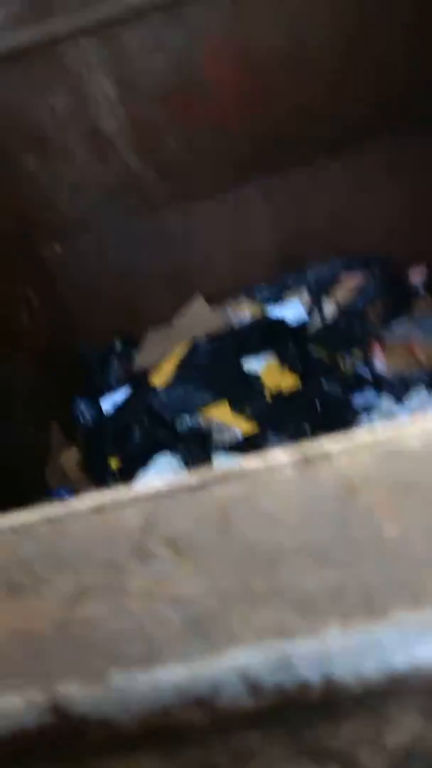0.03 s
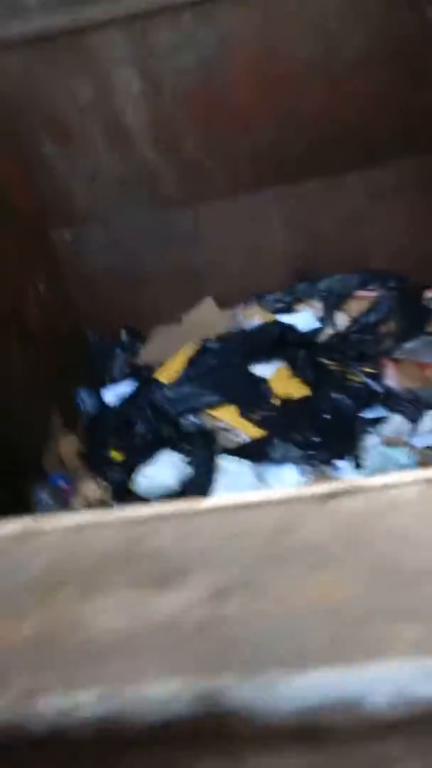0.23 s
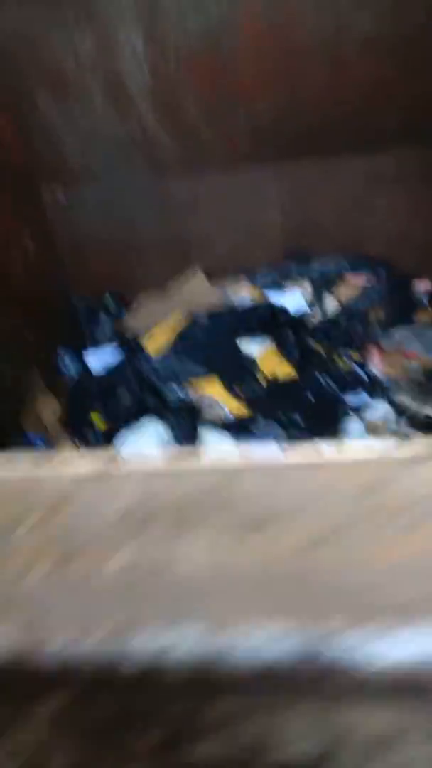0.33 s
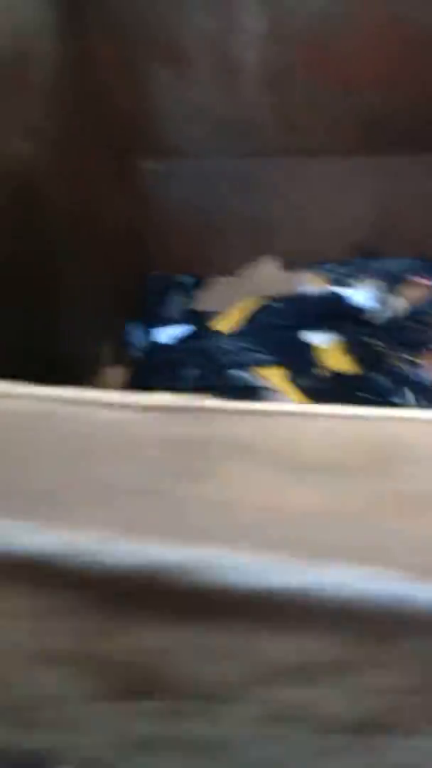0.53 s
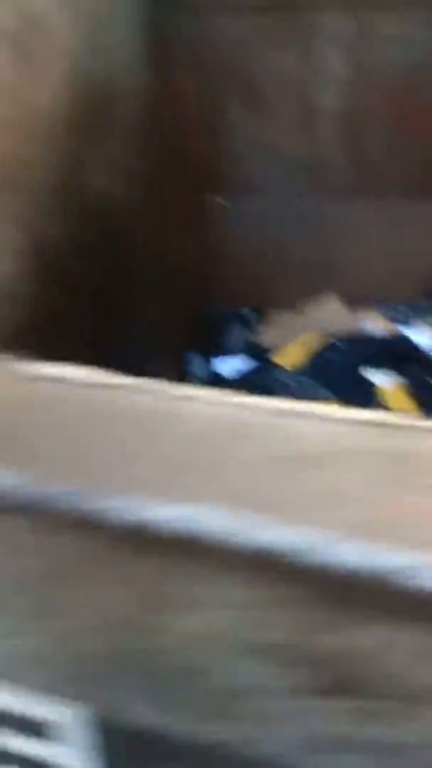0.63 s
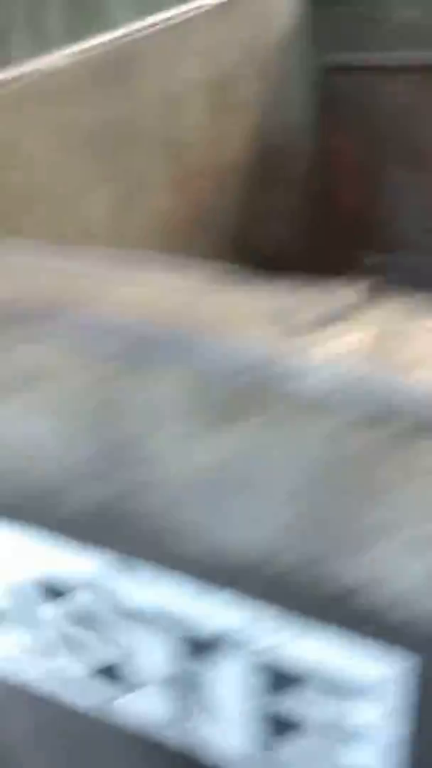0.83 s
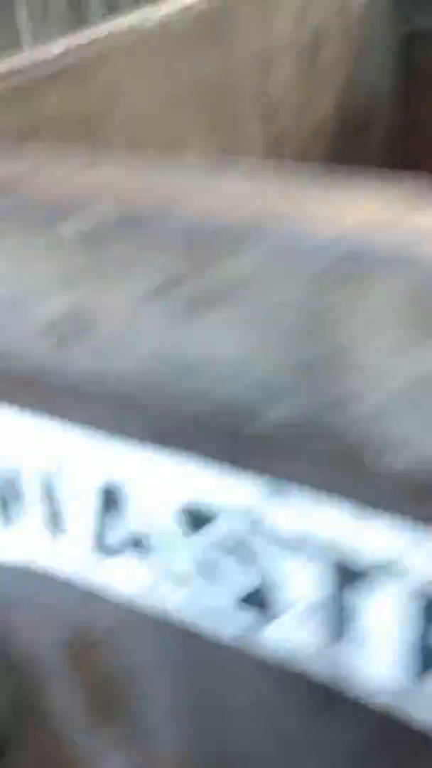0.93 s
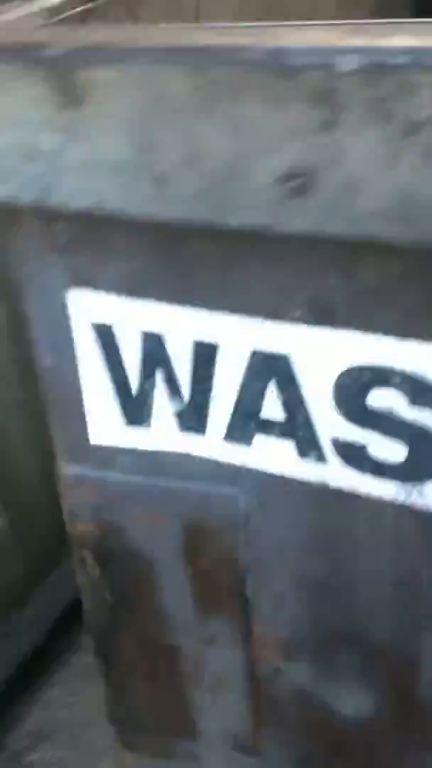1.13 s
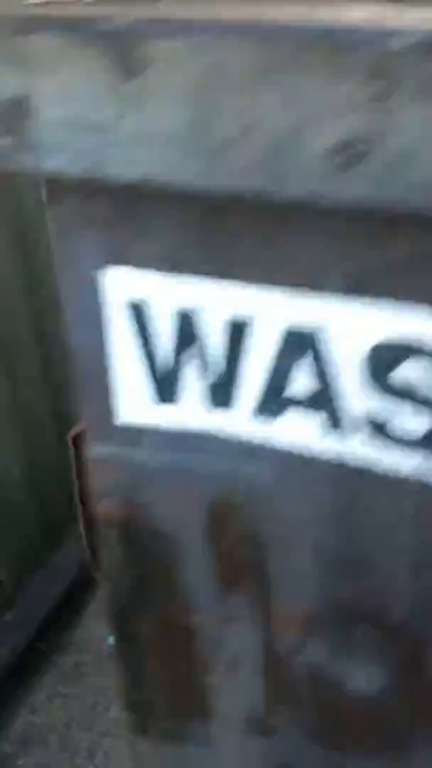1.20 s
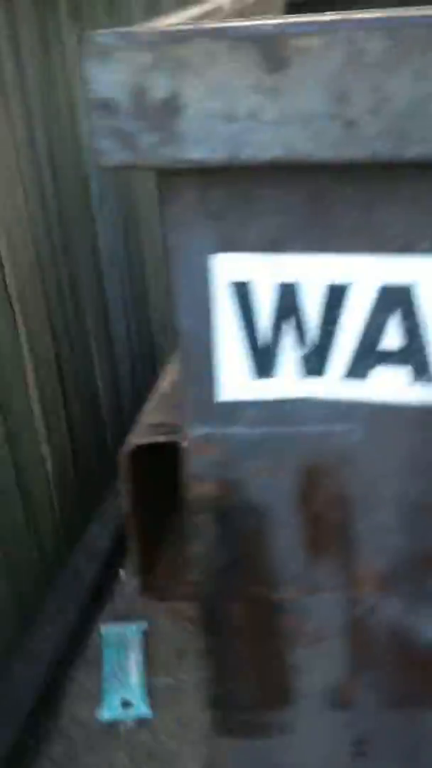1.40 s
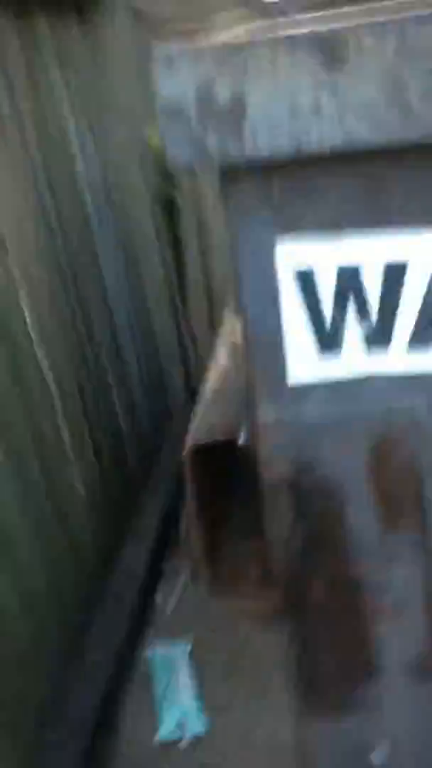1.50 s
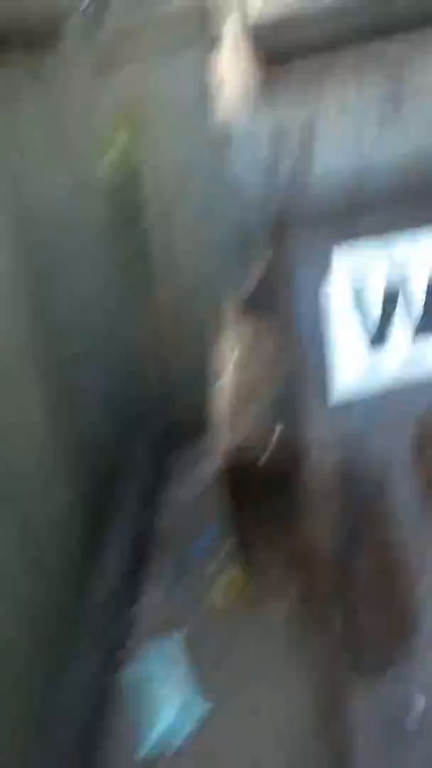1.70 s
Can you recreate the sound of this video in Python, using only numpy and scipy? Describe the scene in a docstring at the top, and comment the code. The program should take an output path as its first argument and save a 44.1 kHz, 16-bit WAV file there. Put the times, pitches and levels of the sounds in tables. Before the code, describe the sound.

Heavy thud and knock in a booming metal dumpster, with faint trash bag rustling.

```python
"""A swish, then a heavy load lands in a steel dumpster: a thud, a knock, and the load slumps.
Outdoors, on one microphone. Each blow shakes the steel sheets, and the walls and the air between
them boom for a second, squeezed by the recorder's limiter. Trash bags rustle inside as they settle,
and a shoe scuffs the ground, faintly midway and plainly at the end, over a low outdoor rumble."""
import sys
import numpy as np
from scipy import signal
from scipy.fft import rfft, irfft, next_fast_len
from scipy.io import wavfile
from scipy.ndimage import uniform_filter1d, minimum_filter1d, map_coordinates

SR = 44100
rng = np.random.default_rng(int(sys.argv[2]) if len(sys.argv) > 2 else 0)


def waveform_to_disk(signal):
    """Save audio, clipped to [-1, 1], as 16-bit WAV at the path in sys.argv[1]."""
    frames = np.transpose(np.atleast_2d(signal))
    scaled = np.clip(frames, -1, 1) * 32767
    samples = np.round(scaled).astype(np.int16)
    wavfile.write(sys.argv[1], SR, samples)


N = 77175

# The load striking the steel. Each row: start in seconds, boom in dB, shudder in dB, shudder cut-off
# in Hz, knock in dB, knock pitch in Hz, crack in dB, tick in dB.
BLOWS = [(0.215, -17.5, -7, 5000, -3.5, 435.4, -3, -48), (.2755, -14.5, -11, 3500, -5, 663, -9.5, -42.5),
         (.362, -15.5, -15, 380, -21, 710, -44.5, -91)]


def dumpster():
    """Every blow feeds the boom, shakes the sheets, knocks and cracks."""
    out = boom()
    for start, _, shudder_db, cutoff_hz, knock_db, knock_hz, crack_db, tick_db in BLOWS:
        out += amp(shudder_db) * shudder(start, cutoff_hz)
        out += amp(knock_db) * knock(start, knock_hz)
        out += crack(start, crack_db, tick_db)
    return out


# The bin's modes; close pairs beat, so the boom throbs at the microphone.
# Each row: pitch in Hz, level in dB, time to fall 60 dB (t60) in seconds.
BIN_MODES = [(48.3, -11.5, 1.48), (59.2, -6, 1.68), (82.2, -24.5, 1.6), (122.9, 4, 0.57),
             (142.4, -4.5, 1.6), (172.2, -6.5, 1.79), (178.4, -1.5, 1.47), (213.7, 5.5, 0.53),
             (247, -1, 0.98), (308.8, -8.5, 1.2), (357, -7.5, 0.69), (395.8, -11, 1.02), (467, -8.5, 0.65),
             (608, -22.5, 1), (728, -18, 0.4), (1110, -26.5, 0.11)]


def boom(rise_cycles=5.3, waver=.14, wavers_per_s=9):
    """Each blow adds energy to the modes, which build over a few swings and waver as the panels flex."""
    out = np.zeros(N)
    since_landing = since(BLOWS[0][0])
    for k, (hz, db, t60) in enumerate(BIN_MODES):
        energy = sum((amp(boom_db) * burst(start, rise_cycles / hz, t60)) ** 2
                     for start, boom_db, *_ in BLOWS)
        phase = 2 * np.pi * hz * since_landing + waver * wobble(wavers_per_s)
        flex = 1 + waver * wobble(wavers_per_s)
        out += (-1) ** k * amp(db) * np.sqrt(energy) * flex * np.sin(phase)
    return out


# The colour of the shaking sheets. Each row: frequency in Hz, relative level in dB.
SHUDDER_SPECTRUM = [(20, -8.5), (50, -8.5), (85, -3.5), (130, 2), (250, 1), (440, 2.5), (550, -12.5),
                    (750, -12), (1300, -25.5), (2600, -37.5), (4000, -51.5), (8000, -62.5), (15000, -82)]
# How long they ring. Each row: frequency in Hz, t60 in seconds.
SHUDDER_DECAY = [(50, 2.05), (170, 1.444), (400, 0.8), (750, 0.66), (1400, 0.39), (3000, 0.45),
                 (9000, 0.74)]


def shudder(start, cutoff_hz):
    """Countless close modes of the sheets; the high ones die sooner, and a soft blow hardly wakes them."""
    hz, t, bands = signal.stft(noise(SHUDDER_SPECTRUM), SR, nperseg=1024)
    decay = amp(-60 * np.maximum(t - start, 0) / along(SHUDDER_DECAY, hz)[:, None])
    lowpass = 1 / np.hypot(1, hz / cutoff_hz)[:, None]
    _, ringing = signal.istft(bands * decay * lowpass, SR, nperseg=1024)
    return ringing[:N] * ramp(start, rise_s=.0016)


# The steel right where the load hits. Each row: ratio to the knock pitch, level in dB.
KNOCK_NOTES = [(.91, -3), (1, -2), (1.1, -8), (1.65, -11)]


def knock(start, hz):
    """The struck spot gives a heavily damped clang of close notes."""
    return notes(KNOCK_NOTES, start, hz) * burst(start, rise_s=.0051, t60_s=.088)


# The body of the contact, then its hard edge. Each row: frequency in Hz, relative level in dB.
CRACK_SPECTRUM = [(200, -3.5), (550, 5), (780, 10.5), (1100, 1.5), (1700, -7.5), (3000, -23), (4500, -58),
                  (8000, -81.5)]
TICK_SPECTRUM = [(1000, -10), (3000, -2.5), (5300, -1.5), (7000, -25), (15000, -42)]


def crack(start, crack_db, tick_db, rise_s=.0029):
    """Load meets steel in a burst of noise with a brief bright tick on top."""
    body = amp(crack_db) * noise(CRACK_SPECTRUM) * burst(start, rise_s, t60_s=.049)
    tick = amp(tick_db) * noise(TICK_SPECTRUM) * burst(start, rise_s, t60_s=.029)
    return body + tick


# The swing on its way to the bin. Each row: time in seconds, level in dB.
SWING_LEVELS = [(0, -55), (.07, -46.5), (0.157, -35.5), (0.202, -36), (.24, -54)]
# The colour of its swish. Each row: frequency in Hz, relative level in dB.
SWISH_SPECTRUM = [(40, -14.5), (130, 5.5), (400, 1.5), (750, -4), (1100, -15), (2500, -23.5), (9000, -37),
                  (15000, -47)]


def swing():
    """The load moves through the air with a swish that swells until it lands."""
    times, db = np.transpose(SWING_LEVELS)
    return noise(SWISH_SPECTRUM) * amp(np.interp(since(0), times, db, right=-120))


# A shoe down at ground level. Each row: start in seconds, scrape in dB, hollow note in Hz,
# ring in dB, grit in dB, rise in seconds, t60 in seconds.
SCUFFS = [(0.7, -39, 635, -53, -72.5, 0.032, 0.078), (1.492, -39.5, 503.5, -38, -94, 0.014, 0.18),
          (1.551, -41, 845, -38.5, -91, 0.0031, 0.14), (1.59, -28.5, 778, -29.5, -48, 0.024, 0.077),
          (1.613, -24, 846, -20, -47.5, 0.0042, 0.082), (1.626, -27.5, 481, -32, -49.5, .018, 0.029),
          (1.652, -32, 517, -28.5, -41, 0.0015, 0.077)]
# The sole, then the grit beneath it. Each row: frequency in Hz, relative level in dB.
SOLE_SPECTRUM = [(60, -26.5), (170, -3), (380, -7), (520, 4), (860, -6.5), (1100, -10.5), (2500, -34),
                 (6000, -55)]
GRIT_SPECTRUM = [(500, -23), (1400, -1.5), (2150, 1), (2700, -2.5), (3300, 3), (4400, -3.5), (5200, -8.5),
                 (6500, -16), (8500, -18.5), (11000, -39.5), (15000, -43)]
# The sole's ring. Each row: ratio to the hollow note, level in dB.
SOLE_NOTES = [(1, -0.5), (1.28, -17), (2.12, -23.5), (2.6, -28)]


def shoe(note_boost_db=5.5):
    """The sole scrapes over grit and knocks with a hollow ring."""
    out = np.zeros(N)
    for start, scrape_db, note_hz, ring_db, grit_db, rise, t60 in SCUFFS:
        scrape = crackle(lambda hz: along(SOLE_SPECTRUM, hz) + note_boost_db * peak(hz, note_hz, .07))
        grit = crackle(lambda hz: along(GRIT_SPECTRUM, hz))
        ring = notes(SOLE_NOTES, start, note_hz)
        scuff = amp(scrape_db) * scrape + amp(ring_db) * ring + amp(grit_db) * grit
        out += scuff * burst(start, rise, t60)
    return out


# Trash bags, heard from outside the bin. Each row: start in seconds, level in dB, rise in seconds,
# t60 in seconds, centre of the bright peak in Hz, a quarter of its width in octaves.
RUSTLES = [(0.073, -51.5, 0.032, 0.15, 3050, 0.64), (0.197, -32.5, 0.014, 0.052, 2350, 0.08),
           (0.407, -37.5, 0.013, 0.11, 2600, 0.18), (.412, -47, 0.027, 0.28, 4540, 0.7),
           (0.538, -64, 0.021, 1.8, 3000, .25), (0.691, -42, 0.021, 0.22, 1670, 0.38),
           (.697, -58.5, .012, 0.57, 8100, 0.62), (0.827, -54, 0.0036, 0.034, 5150, 0.055),
           (0.824, -53.5, 0.0043, 0.15, 2410, 0.051), (0.859, -63, 0.01, 1.1, 2790, 0.58),
           (1.072, -56, 0.0068, 0.14, 2900, 0.5), (1.103, -58.5, 0.0075, 0.2, 3340, 1),
           (1.338, -58, 0.0049, 0.23, 3020, 0.17)]
# The colour all the plastic shares. Each row: frequency in Hz, relative level in dB.
PLASTIC_SPECTRUM = [(300, -10.5), (1000, 21), (2500, 10.5), (8000, -6), (11000, -14), (15000, -25.5)]


def bags(focus_db=16.5, skirt_db_per_octave=1.5):
    """Plastic crinkles in short bursts, each brightened around its own pitch."""
    out = np.zeros(N)
    for start, db, rise, t60, centre_hz, width in RUSTLES:
        def colour_db(hz):
            focus = focus_db * peak(hz, centre_hz, width)
            skirt = skirt_db_per_octave * np.abs(np.log2((hz + 1) / centre_hz))
            return along(PLASTIC_SPECTRUM, hz) + focus - skirt
        out += amp(db) * crackle(colour_db) * burst(start, rise, t60)
    return bin_walls(out)


def bin_walls(x, count=8, share=.45, nearest_s=.0014, farthest_s=.009):
    """Reflections off the close walls reach the microphone just late enough to sound hollow."""
    delays = rng.uniform(nearest_s, farthest_s, count)
    echoes = sum(np.pad(x, (int(delay * SR), 0))[:N] for delay in delays)
    return (x + share * echoes) / np.sqrt(1 + count * share ** 2)


# The open air around the microphone. Each row: frequency in Hz, relative level in dB.
AIR_SPECTRUM = [(20, 3), (130, -2), (250, -7), (500, -10.5), (720, -16), (1000, -18), (1850, -30.5),
                (2350, -42), (4000, -47.5), (9000, -54), (15500, -72)]


def outdoor_air(level_db=-42.5):
    """A steady low rumble lies behind everything."""
    return amp(level_db) * noise(AIR_SPECTRUM)


def amp(db):
    """Decibels as an amplitude factor."""
    return 10 ** (np.asarray(db) / 20)


def unit(x):
    """x scaled to rms 1."""
    return x / np.sqrt(np.mean(x ** 2) + 1e-20)


def along(points, hz):
    """A curve through (Hz, value) points on a log frequency axis."""
    frequencies, values = np.transpose(points)
    return np.interp(np.log(hz + 1), np.log(frequencies + 1), values)


def peak(hz, centre_hz, width):
    """A bell that is 1 at the centre and one half at 2 * width octaves to either side."""
    return 1 / (1 + (np.log2((hz + 1) / centre_hz) / (2 * width)) ** 2)


def since(start):
    """Seconds since start, zero before it."""
    return np.maximum(np.arange(N) / SR - start, 0)


def ramp(start, rise_s):
    """A smooth step from 0 to 1."""
    return np.sin(np.pi / 2 * np.minimum(since(start) / rise_s, 1)) ** 2


def burst(start, rise_s, t60_s):
    """An envelope that rises to 1 and dies away."""
    return ramp(start, rise_s) * amp(-60 * since(start + rise_s) / t60_s)


def wobble(rate):
    """A smooth random curve, rate knots a second."""
    return map_coordinates(rng.standard_normal(N), [np.arange(N) * rate / SR], mode="mirror")


def filtered(x, response):
    """x through a gain that depends on frequency."""
    size = next_fast_len(N + SR // 2)
    return irfft(rfft(x, size) * response(np.fft.rfftfreq(size, 1 / SR)), size)[:N]


def noise(spectrum):
    """Coloured noise of rms 1."""
    return unit(filtered(rng.standard_normal(N), lambda hz: amp(along(spectrum, hz))))


def crackle(colour_db, clump_db=2.8, clumps_per_s=700):
    """Many tiny snaps in clumps, coloured and scaled to rms 1."""
    snaps = rng.standard_normal(N) * amp(clump_db * wobble(clumps_per_s))
    return unit(filtered(snaps, lambda hz: amp(colour_db(hz))))


def notes(table, start, hz):
    """A cluster of sines at fixed ratios to hz, set going at start."""
    return sum(amp(db) * np.sin(2 * np.pi * ratio * hz * since(start)) for ratio, db in table)


def scene():
    """Everything that reaches the one microphone."""
    return (dumpster() + swing() + bags() + shoe() + outdoor_air())[None]


def record(dry):
    """The recorder's limiter ducks at once and recovers slowly; nothing passes above the band limit."""
    ceiling, release_db_per_s, window_s, top_hz = .99, 56.5, .002, 15700
    mic, window = dry[0], int(window_s * SR)
    excess_db = 20 * np.log10(np.maximum(np.abs(mic) / ceiling, 1))
    needed_db = minimum_filter1d(-excess_db, window)
    recovery_db = release_db_per_s * since(0)
    gain_db = np.minimum.accumulate(needed_db - recovery_db) + recovery_db
    limited = mic * amp(uniform_filter1d(gain_db, window))
    return filtered(limited, lambda hz: hz < top_hz)[None]


dry = scene()
out = record(dry)
waveform_to_disk(out)
```